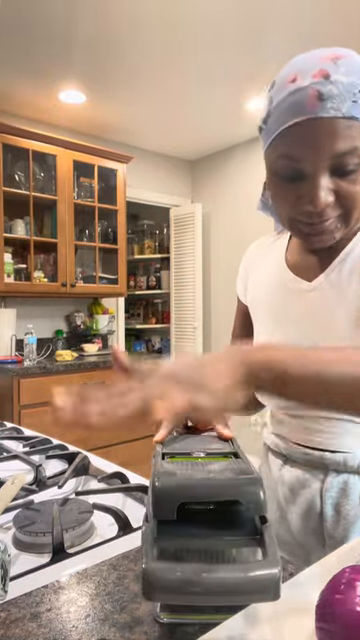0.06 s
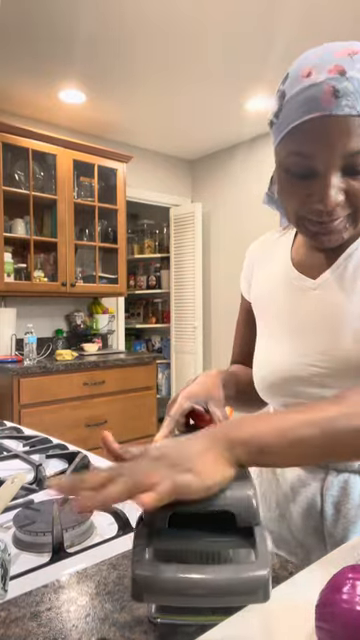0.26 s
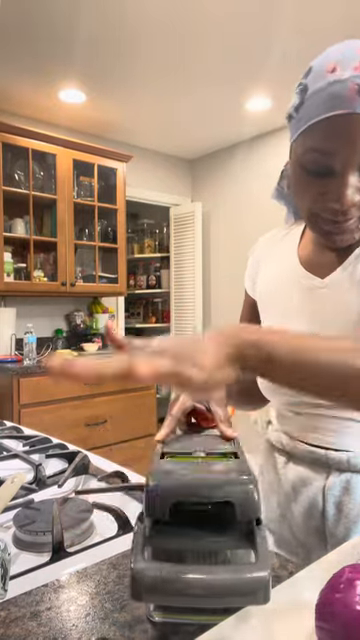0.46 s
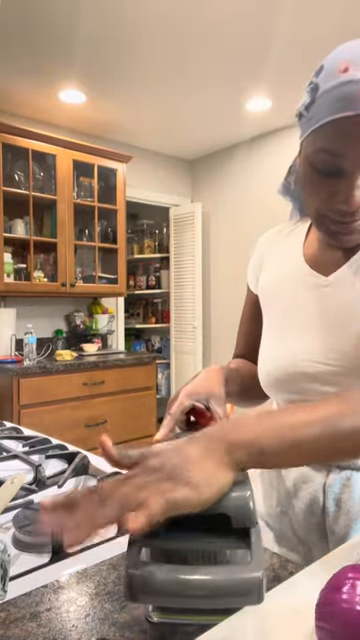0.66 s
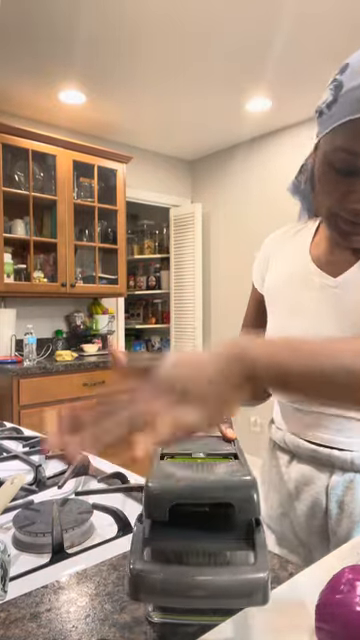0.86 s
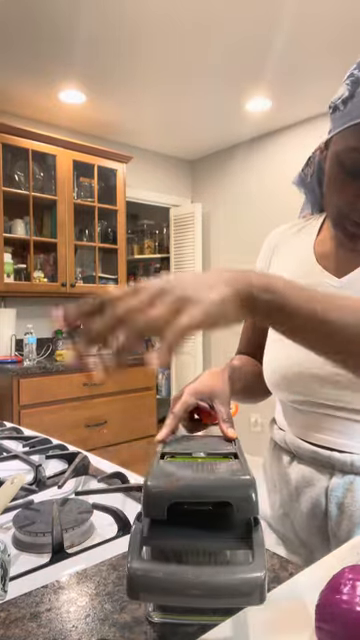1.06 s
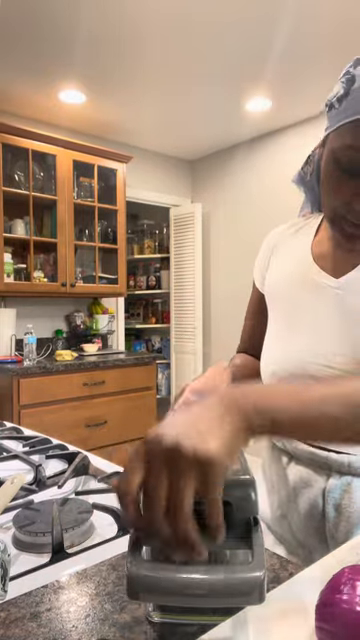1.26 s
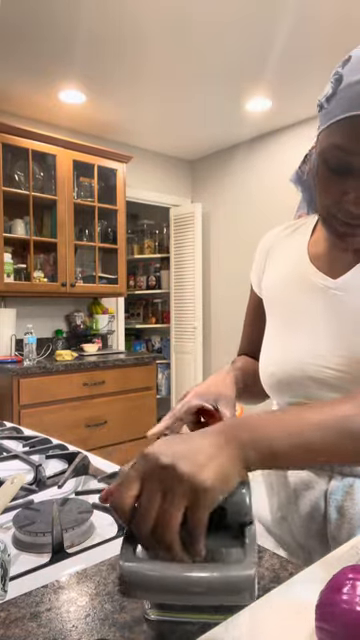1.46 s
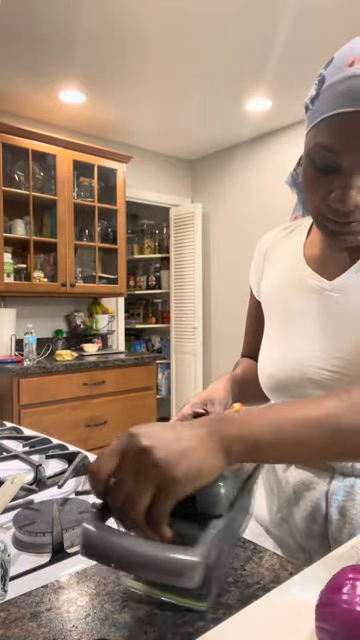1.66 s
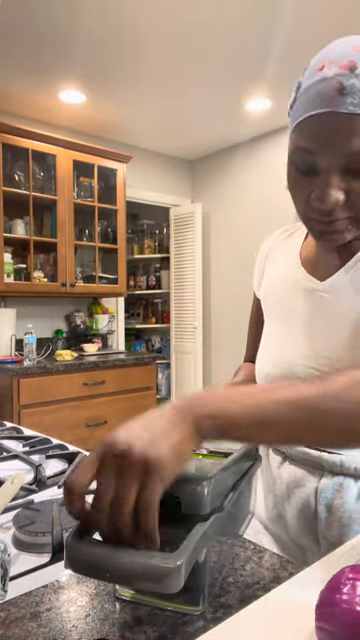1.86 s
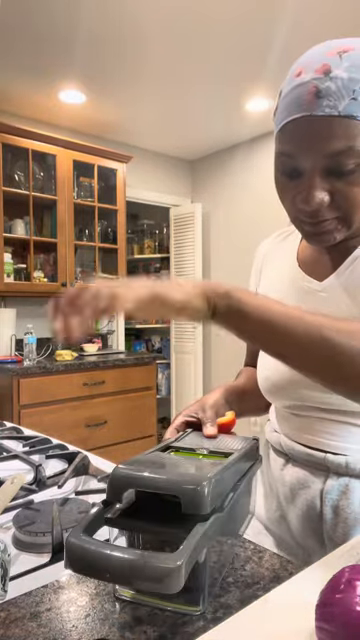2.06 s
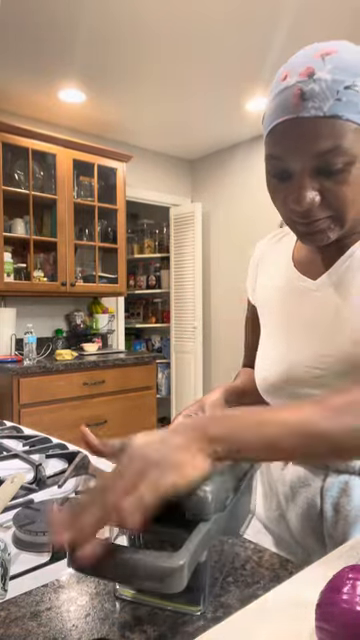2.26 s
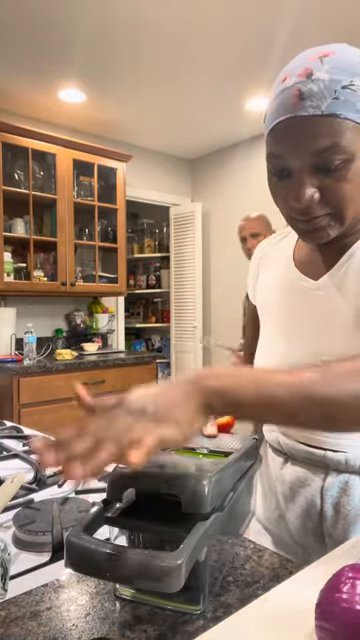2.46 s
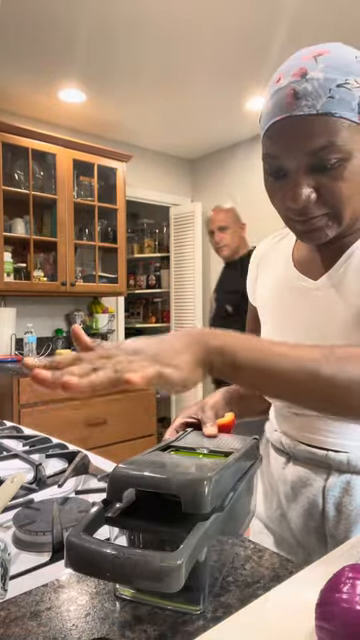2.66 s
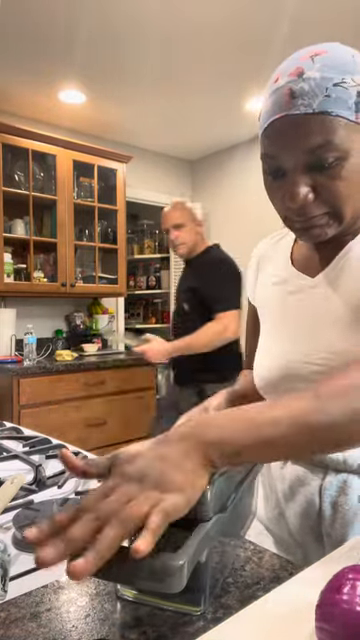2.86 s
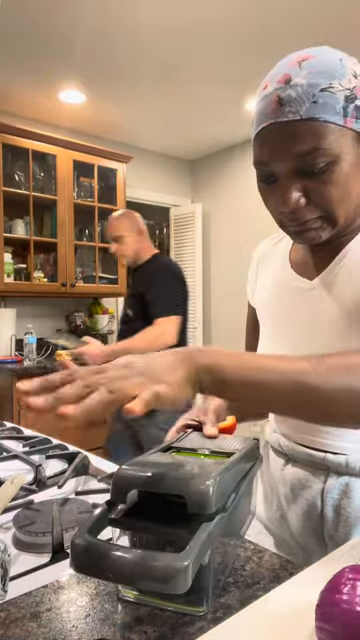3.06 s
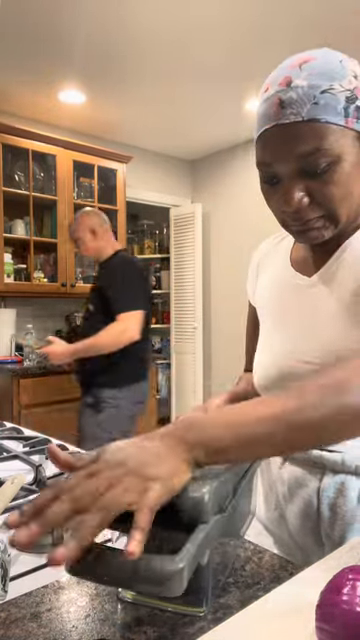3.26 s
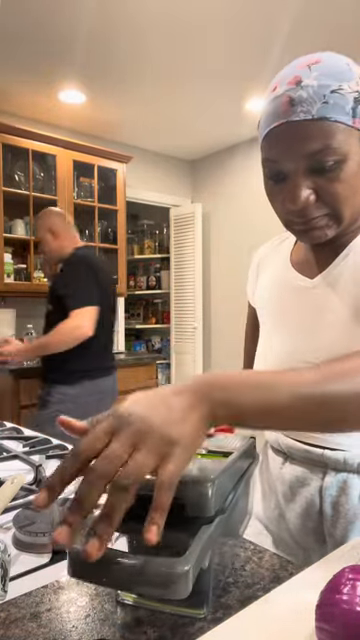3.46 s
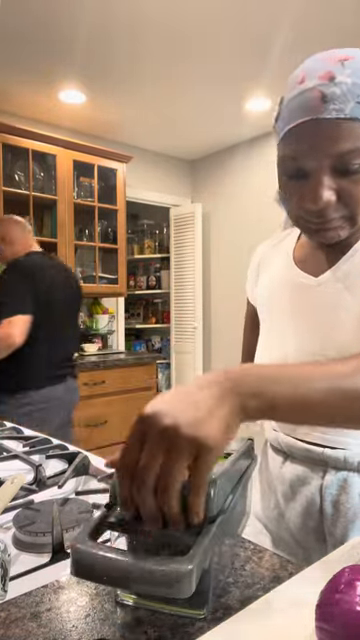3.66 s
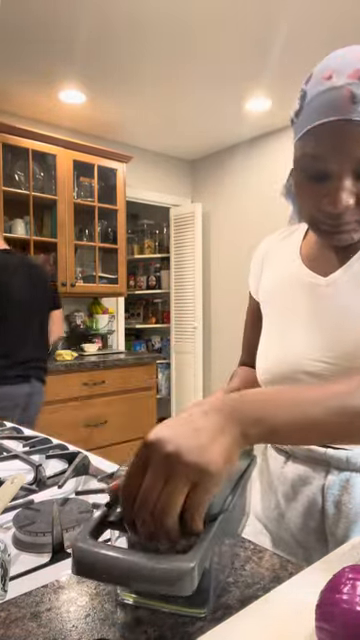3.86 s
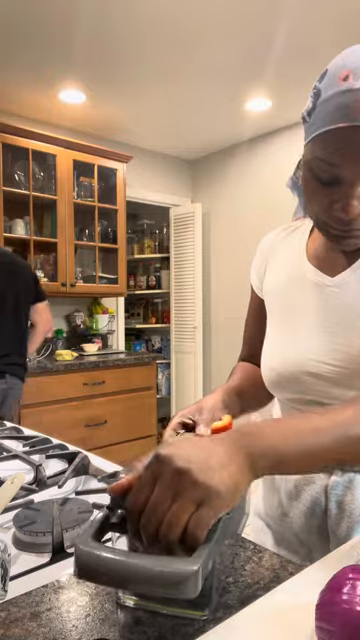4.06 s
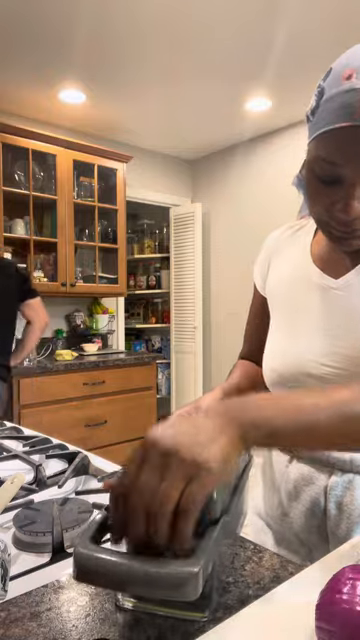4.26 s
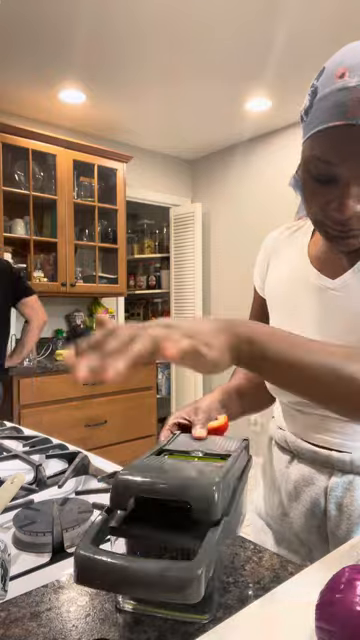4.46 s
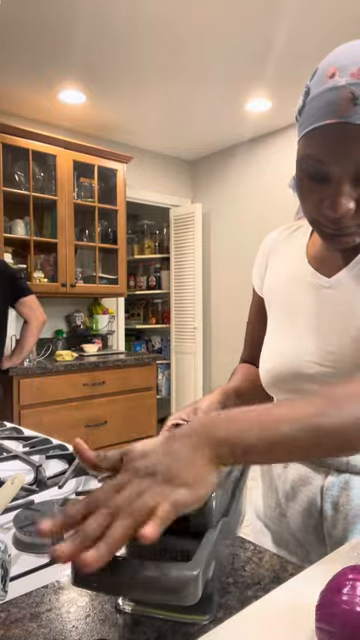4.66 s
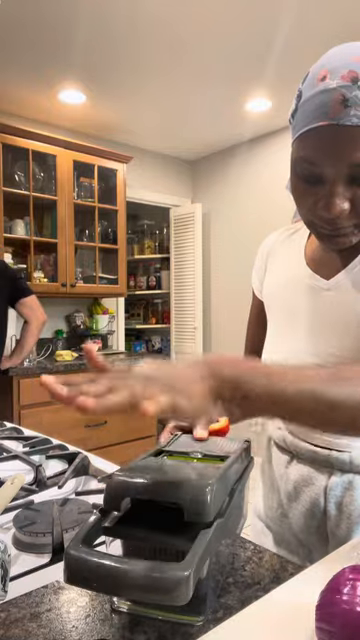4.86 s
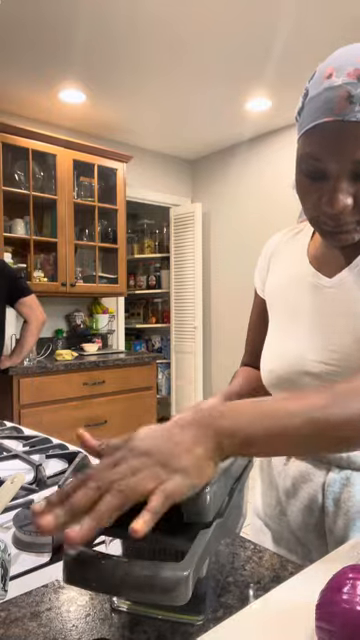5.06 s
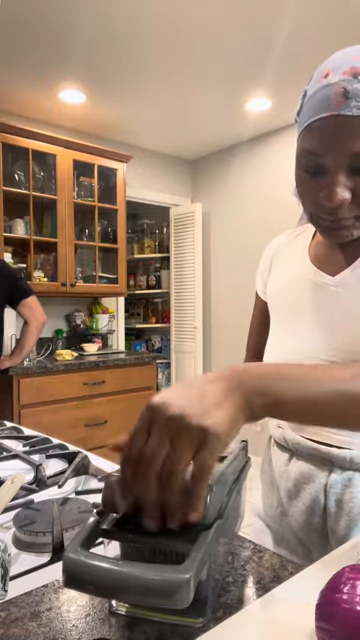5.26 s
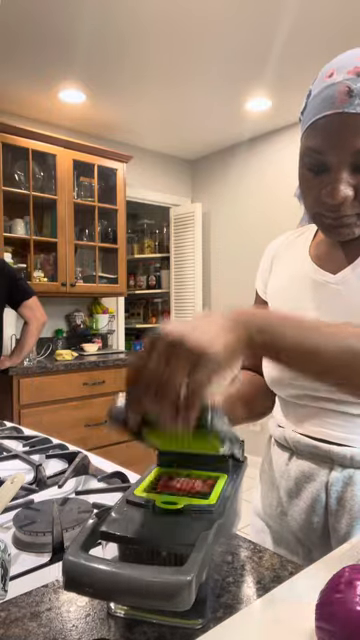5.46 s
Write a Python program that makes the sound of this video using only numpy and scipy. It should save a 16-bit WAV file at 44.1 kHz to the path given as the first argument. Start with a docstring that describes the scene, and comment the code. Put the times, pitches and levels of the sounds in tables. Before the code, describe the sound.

Seven loud, hard plastic slams in uneven groups of two, three and two, close in stereo. Between them the loose lid knocks and clacks hollowly, and fingers tick, scuff and squeak very faintly. The counter gives a brief low thump; the hard kitchen answers with a short, bright tail. A soft low room noise stays underneath.

```python
"""Slamming a vegetable chopper

A palm slams the lid of a plastic chopper seven times to force a tomato through its blade grid.
Each slam is a burst of noisy contacts that rings the box, plus a swaying counter and kitchen echoes.
Between slams the lid clacks lightly in its hinge; fingers rub, scuff and squeak as shaped noise.
Under it all lies the low noise of the quiet kitchen."""
import sys
import numpy as np
from scipy import signal
from scipy.fft import rfft, irfft
from scipy.io import wavfile
from scipy.ndimage import uniform_filter1d

SR = 44100
rng = np.random.default_rng(int(sys.argv[2]) if len(sys.argv) > 2 else 0)


def materialize(psi):
    """Save the field psi as 16-bit PCM at rate SR to the path in sys.argv[1].

    A 1-D psi becomes a single channel; in a 2-D psi each row is a channel.
    """
    bounded = np.clip(np.atleast_2d(psi).T, -1, 1)
    quanta = np.round(bounded * 32767).astype(np.int16)
    wavfile.write(sys.argv[1], SR, quanta)


N = 243032
LEAD = SR // 2  # samples of extra time before the start
AHEAD = 0.04  # seconds from the start of a blow's sound to the contact

# The four parts of a blow: knock, clack, crack and snap; the low ones are the last to build.
# The times are for a blow of length 1. Columns:
# low_hz [Hz], high_hz [Hz], delay_s [s], rise_s [s], fall_s [s], trim_db [dB]
BLOW_PARTS = [(125, 705, 0.0062, 0.007, 0.0079, -1), (540, 2700, .0045, 0.0024, 0.0071, -1),
              (1950, 5830, 0.0019, 0.0033, 0.0081, 1), (6130, 45000, 0.001, 0.0027, .004, -5)]


def amp(db):
    """Turns decibels into a gain."""
    return 10 ** (np.asarray(db) / 20)


def evened(x):
    """Scales a sound to an rms (average strength) of 1."""
    return x / np.sqrt(np.mean(x ** 2) + 1e-20)


def read(points, hz):
    """Reads a table of (Hz, value) along a logarithmic frequency axis."""
    f, value = np.transpose(points)
    return np.interp(np.log(hz + 1), np.log(np.sort(f) + 1), value)


def add(mix, s, sound):
    """Adds a sound at a time in seconds to a mix that begins LEAD samples early."""
    first = max(round(s * SR) + LEAD, 0)
    part = mix[:, first:][:, :sound.shape[-1]]
    part += sound[..., :part.shape[1]]


def causal(gain):
    """Gives a gain curve the phase (minimum phase) that makes it ring only after the blow."""
    log_gain = np.log(np.maximum(gain, 1e-5))
    circle = np.concatenate([log_gain, log_gain[-2:0:-1]])
    return np.exp(np.conj(signal.hilbert(circle)))[:len(gain)]


def noise(colour, shared_hz=450):
    """Makes coloured noise, alike at both ports in the bass and unrelated in the treble."""
    hz = np.fft.rfftfreq(N, 1 / SR)
    left, other = rfft(rng.standard_normal((2, N)))
    same = 1 / (1 + (hz / shared_hz) ** 2)
    right = same * left + np.sqrt(1 - same ** 2) * other
    pair = np.array([left, right])
    return evened(irfft(pair * amp(read(colour, hz)), N))


def air(level_db=-59.5, waver_db=1.02, waver_s=0.16):
    """The low rumble of the quiet kitchen: steady noise whose level swells and sinks a little."""
    # colour of the still air: pitch_hz [Hz], level_db [dB]
    air_colour = [(25, -12.5), (45, -2.5), (80, 1.5), (150, -6.5), (250, -7.5), (350, -10), (550, -27),
                  (850, -25.5), (1250, -30), (2200, -32), (4000, -36), (8000, -47), (11000, -50.5),
                  (14000, -65.5)]
    t = np.arange(N) / SR
    waver = np.interp(t / waver_s, np.arange(256), rng.standard_normal(256))
    return amp(level_db + waver_db * waver) * noise(air_colour)


def kitchen(x, near_db, far_db, near_t60=0.18, near_start=0.0017, far_start=0.036,
            shared_hz=380, near_low_hz=220):
    """Quick reflections from counter and stove, then the room's tail; the moving arm changes them."""
    # time for the tail to fall by 60 dB: pitch_hz [Hz], t60_s [s]
    room_t60 = [(100, 2.1), (300, 0.44), (900, 0.5457), (2500, 0.59), (5000, 0.53), (9000, 0.47),
                (13000, 0.26)]
    # strength of the tail, before far_db: pitch_hz [Hz], level_db [dB]
    room_db = [(80, -26), (170, -13.5), (350, -6.5), (900, -17), (2500, -13), (6000, -12), (10000, -13),
               (14000, -14)]
    # the echoes are dying noise, drawn afresh on every call
    hz, t, z = signal.stft(rng.standard_normal((2, SR * 5 // 8)), SR, nperseg=256)
    same = (1 / (1 + (hz / shared_hz) ** 4))[:, None]  # the bass is alike at both ports
    z[1] = same * z[0] + np.sqrt(1 - same ** 2) * z[1]

    def decay(t60, start):
        """Fades in around the start time, then dies away; its overall energy is evened."""
        shape = np.exp(-np.log(1000) * t / t60) * np.clip(2 * t / start - 1, 0, 1)
        return shape / np.sqrt(SR * t[-1] * np.mean(shape ** 2, -1, keepdims=True))

    bass_cut = (hz ** 2 / (hz ** 2 + near_low_hz ** 2))[:, None]
    near = amp(near_db) * decay(near_t60, near_start) * bass_cut
    far_gain = amp(far_db + read(room_db, hz))[:, None]
    far = far_gain * decay(read(room_t60, hz)[:, None], far_start)
    absorbed = 1 / np.sqrt(1 + (hz[:, None] / 11800) ** 24)  # steep loss of the highest treble
    room = signal.istft(z * np.hypot(near, far) * absorbed, SR, nperseg=256)[1]
    return signal.fftconvolve(x, room, axes=1)


def rubbing(rub_db=7.0, grain_db=1.0, speed_power=0.94):
    """Skin and cloth slide over the plastic with a grainy hiss; each stroke speeds up and slows down."""
    # strokes of fingers and sleeve on the lid; the levels are before rub_db:
    # fastest_s [s], level_db [dB], swell_s [s], fade_s [s]
    strokes = [(1.96,-74,.03,0.14), (3.855,-77,0.091,.065), (4.272,-64,.01,0.018), (4.295,-76,0.072,.1),
               (5.273,-62.5,0.05,0.13), (5.401,-72,0.089,.4)]
    # colour of the hiss: pitch_hz [Hz], level_db [dB]
    rub_colour = [(200, 13.5), (800, 3), (2000, -3.5), (4000, -3.5), (8000, -4), (11000, -8), (13000, -23)]
    t, level = np.arange(N) / SR, np.zeros(N)
    for s, db, swell, fade in strokes:
        speed = np.interp(t, [s - swell, s, s + fade], [0, 1, 0])
        level += amp(db) * speed ** speed_power  # friction grows with the speed
    roughness = evened(uniform_filter1d(rng.standard_normal(N), size=90))
    grain = evened(amp(grain_db * roughness))
    smooth_level = uniform_filter1d(level, size=900)
    return amp(rub_db) * smooth_level * grain * noise(rub_colour)


def squeak(start_s=3.98, length_s=0.25, level_db=-77.5, pitch_hz=(3230, 2820), width_hz=260, fade_db=-6):
    """A finger drags faintly over the lid: a narrow, sinking band of friction noise."""
    u = np.linspace(0, 1, round(length_s * SR))  # share of the drag that is done
    low_pass = signal.butter(2, width_hz / 2, fs=SR, output="sos")
    slip = signal.sosfilt(low_pass, rng.standard_normal((2, len(u))))
    turns = np.cumsum(np.interp(u, [0, 1], pitch_hz)) / SR
    tone = evened(slip * np.sin(2 * np.pi * turns))  # moves the slow noise up to the pitch
    mix = np.zeros((2, N + LEAD))
    add(mix, start_s, amp(level_db + fade_db * u) * signal.windows.tukey(len(u), .1) * tone)
    return mix


def scuffs(size=22050):
    """Soft things brush and bump: short puffs of friction noise that lose their treble."""
    # soft scuffs and dull bumps; each is dull above dull_hz:
    # start_s [s], level_db [dB], rise_s [s], t60_s [s], dull_hz [Hz]
    bumps = [(3.975,-58,0.0048,0.19,2594), (4.238,-49.5,0.015,0.37,380), (4.402,-37,0.004,0.24,459)]
    # colour before the dulling: pitch_hz [Hz], level_db [dB]
    scuff_colour = [(60, -8.5), (200, 8), (330, 7.5), (600, -3.5), (1500, -8.5), (3100, -4.5),
                    (4200, -16.5), (12000, -18)]
    mix, t, hz = np.zeros((2, N + LEAD)), np.arange(size) / SR, np.fft.rfftfreq(size, 1 / SR)
    for s, db, rise, t60, dull_hz in bumps:
        colour = amp(read(scuff_colour, hz)) / np.sqrt(1 + (hz / dull_hz) ** 3)
        puff = evened(irfft(rfft(rng.standard_normal(size)) * colour))
        fade = np.exp(-np.log(1000) * np.maximum(t - rise, 0) / t60)
        puff *= amp(db) * np.minimum(t / rise, 1) * fade
        add(mix, s, puff)
        add(mix, s, kitchen(puff[None], near_db=3.5, far_db=-1))
    return mix


def chatter(envelope, count=2):
    """A burst of tiny contacts under an envelope, with its energy spread evenly over frequency."""
    burst = envelope * rng.standard_normal(len(envelope))
    for _ in range(count):
        spectrum = rfft(burst)
        flat = irfft(spectrum / (abs(spectrum) + 1e-12))
        burst = flat * np.sqrt(envelope)
    return burst


def responses(modes, ring_hz, ring_db, depth, dull_hz=20000, size=8192, ring_share=.09):
    """How the plastic answers each part of a blow; where the hand lands changes one ring most."""
    # broad colour of the plastic: pitch_hz [Hz], level_db [dB]
    plastic_colour = [(100, -11.5), (170, -12), (215, -14), (400, -11), (560, -13.5), (700, -11),
                      (1050, -12), (1600, -18), (2100, -18.5), (2450, -21.5), (4500, -24.5), (7500, -27),
                      (10500, -32), (13500, -37)]
    # how far the left port leads the right: pitch_hz [Hz], lead_rad [radians]
    port_phase = [(330, 0), (580, -1.1), (700, -3.9), (1000, -4.3), (1120, -6.5), (1500, -4.2),
                  (2100, -5.2), (2550, -2.6), (3200, -4.6), (4200, -5.2), (4700, -8.5), (5600, -6.1),
                  (9000, -5.2), (13000, -3.6)]
    # left level against right at depth 1: pitch_hz [Hz], difference_db [dB]
    port_balance = [(330, 0), (400, -6), (520, -1), (650, -7), (830, -10), (1050, -2), (1270, -6),
                    (1430, 0), (1900, -3), (2500, -1), (4000, -6), (5300, 0)]
    hz = np.fft.rfftfreq(size, 1 / SR)
    rings = sum(amp(db) ** 2 / (1 + ((hz - f) / width) ** 2) ** 2 for f, width, db in modes)
    broad = amp(read(plastic_colour, hz))
    favoured = amp(ring_db / (1 + ((hz / ring_hz - 1) / ring_share) ** 2))
    peaks = np.sqrt(1 + rings / broad ** 2) * favoured
    soft = 1 / np.sqrt(1 + (hz / dull_hz) ** 2)  # a gentle contact loses treble
    lean = amp(depth * read(port_balance, hz) / 2)
    ports = np.array([lean * np.exp(1j * read(port_phase, hz)), 1 / lean])
    out = []
    for low_hz, high_hz, *_ in BLOW_PARTS:
        band = 1 / np.sqrt((1 + (low_hz / (hz + 1)) ** 8) * (1 + (hz / high_hz) ** 6))
        # a smaller depth flattens the resonances
        out.append(ports * causal(broad * soft * peaks ** depth * band))
    return out


def blow(plastic, levels_db, length, run_in_db, run_in, size=8192, skid_s=0.017, skid_hz=4494):
    """The lid skids, chatters against the frame and rings the plastic; the sound starts before contact."""
    t = np.arange(size) / SR - AHEAD
    skid_start = np.clip((t + skid_s) / 0.0059, 0, 1)  # fades in from skid_s before landing
    out = np.zeros((2, size))
    for response, db, (low_hz, _, delay, rise, fall, trim_db) in zip(plastic, levels_db, BLOW_PARTS):
        u = t / max(length, .2) - delay  # a long blow stretches time
        contact = np.exp(-(u / np.where(u < 0, rise, fall)) ** 2 / 2)
        dulling = 1 + (low_hz / skid_hz) ** 2  # the skid is weaker in the high parts
        skid = amp(run_in_db) * np.exp(-abs(u) / run_in) * skid_start / dulling
        part = irfft(rfft(chatter(contact + skid)) * response)
        out += amp(db + trim_db) * evened(part)
    return out


def thump(size=16384, soft=0.00092, low_hz=48):
    """Low sway of counter and box, pushed down first and then springing back."""
    # one sway under the blow and one as the hand bottoms out:
    # delay_s [s], pitch_hz [Hz], t60_s [s], level_db [dB]
    sways = [(.0148, 77.03, 0.13, 3.5), (.0325, 103.8, 0.071, -2)]
    t, out = np.arange(size) / SR, np.zeros(size)
    for k, (delay, hz, t60, db) in enumerate(sways):
        u = np.maximum(t - delay, 0)
        fade = np.exp(-np.log(1000) * u / t60)
        onset = 1 - np.exp(-u / soft)
        out -= (-1) ** k * amp(db) * fade * np.sin(2 * np.pi * hz * u) * onset
    out = signal.sosfilt(signal.butter(4, low_hz, "high", fs=SR, output="sos"), out)
    return out * amp(0) * np.array([[1.0], [1.0]]) * amp([[-.4], [.4]])  # slightly louder on the right


def ticks(from_s=1.38, to_s=1.9, ticks_per_s=14, tick_db=-60.5, spread_db=1.0, hardness_db=-4,
          push_db=-5, length=.7, ring_hz=800):
    """Fingers that hold the lid make it tick faintly: light clacks at uneven, random moments."""
    times = np.arange(from_s, to_s, 1 / ticks_per_s)
    late, strength = rng.uniform(-0.88, 1, (len(times), 2)).T
    moments = times + late / ticks_per_s / 2
    return [(s, tick_db + spread_db * k, hardness_db, push_db, length, ring_hz)
            for s, k in zip(moments, strength)]


def clacks(clack_db=-15.0, sway_db=-4.5):
    """The loose lid knocks hollowly on its frame; a harder contact has more treble."""
    # light clacks of the lid rocking in its hinge; levels are before clack_db and sway_db:
    # contact_s [s], level_db [dB], hardness_db [dB of treble], push_db [dB of thump against clack],
    # length [factor], ring_hz [Hz, the ring it brings out]
    lid_clacks = [(0.308,-38,-1.5,-11,1.28,1710), (0.338,-27,-2,-6,0.62,705),
                  (0.723,-36.5,4.5,-12,0.83,810), (1.034,-49,-2,-2,0.81,912), (1.14,-50.5,-13,-7,0.96,970),
                  (1.27,-31.5,-1,-0.5,0.7,426.6), (1.289,-41,3,6,1.1,825), (1.339,-44,-0.5,3.5,1.3,636),
                  (1.729,-25,0.5,-3.5,0.84,747), (1.751,-40.5,-0.5,4,1.0,239),
                  (1.849,-38.5,-8.5,1.5,0.59,890), (1.905,-44,-7.5,-7,0.6,845),
                  (2.378,-32.5,3.5,-15.5,2.33,588), (3.454,-41.5,-20,-15.5,2,645),
                  (3.470,-33,-3.5,-21,0.97,725), (3.481,-32,7,-10,0.76,760),
                  (4.002,-59.5,-0.5,23.5,0.85,902), (4.275,-49,-0.5,-11,0.38,790),
                  (4.3,-47,-5,-13.5,0.86,645), (5.345,-41.5,1,-12,0.56,748)]
    # make-up of a clack, for knock, clack, crack and snap:
    # level_db [dB], follows [share of the hardness]
    make_up = [(0.5, 0.041), (-1.36, .15), (-12, .9), (-21, 0.95)]
    # resonances of the loose lid: pitch_hz [Hz], width_hz [Hz], level_db [dB]
    lid_modes = [(246,28,-8), (429,29,1.5), (630,32,1.5), (770,35,-8.5), (825,17,-2), (960,95,-9),
                 (1480,90,-11.5), (1789,70,-8.5), (2000,38,-13.5), (3750,41,-19)]
    mix, sway = np.zeros((2, N + LEAD)), thump()
    parts_db, follows = np.transpose(make_up)
    for s, db, hardness_db, push_db, length, ring_hz in lid_clacks + ticks():
        lid = responses(lid_modes, ring_hz, ring_db=7.0, depth=0.89, dull_hz=895)
        levels_db = db + parts_db + follows * hardness_db
        clack = amp(clack_db) * blow(lid, levels_db, length, run_in_db=-20, run_in=0.0025)
        add(mix, s - AHEAD, clack)
        add(mix, s - AHEAD, kitchen(clack, near_db=-2.5, far_db=-4.5))
        add(mix, s, amp(db + push_db + sway_db) * sway)
    return mix


def gripped(modes):
    """The palm loads the box differently each time: every resonance shifts in pitch and strength."""
    pitch, strength = rng.standard_normal((2, len(modes)))
    hz, width, db = np.transpose(modes)
    return np.transpose([hz * (1 + .008 * pitch), width, db + 1.8 * strength])


def slams(slam_db=-7.5, sway_db=1.5, spread_depth=0.45, thump_db=-11.5, thump_follows=.4,
          earlier_s=.24, earlier_db=3):
    """Each slam is a burst of plastic chatter over the thump of the counter."""
    # slams of the lid; levels are before slam_db:
    # contact_s [s], level_db [dB], run_in_db [dB against the crack], length [factor],
    # ring_hz [Hz], ring_db [dB by which the blow lifts or weakens that ring]
    lid_slams = [(0.197,0.5,-17.5,0.83,857,4), (0.590,-0.25,-8,0.92,1163,8), (2.232,-1,-8.5,1.24,417,10),
                 (2.723,-2,-10.5,0.95,1238,6), (3.156,-1,-7,1.34,830,-9), (4.553,-0.3,-19,0.97,325,9.5),
                 (4.937,-3.5,-13,1.29,1432,4)]
    # make-up of every slam: level_db [dB] of knock, clack, crack and snap
    make_up_db = [-21.5, -15, -21.5, -23.5]
    # resonances of the box, before the grip shifts them: pitch_hz [Hz], width_hz [Hz], level_db [dB]
    box_modes = [(278,72,-6.5), (329,19,0.5), (433,30,-3.5), (509,21,-9.5), (645,77,-7), (827.3,38,2),
                 (985,40,-7.5), (1154,26,-8), (1374,12,-10), (1428,75,-9), (1740,34,-9.5), (1936,52,-14.5),
                 (2082,9.2,-10.5), (2270,100,-17), (2745,170,-15.5), (2960,130,-16.5), (3390,36,-13),
                 (3670,65,-18), (4280,200,-19.5), (5010,60,-17), (5380,63,-21), (6802,180,-24.5),
                 (7440,140,-25.5)]
    mix, sway = np.zeros((2, N + LEAD)), thump()
    boom = kitchen(sway, near_db=-14.5, far_db=-3.5)
    for s, db, run_in_db, length, ring_hz, ring_db in lid_slams:
        box = gripped(box_modes)
        levels_db = db + np.array(make_up_db)
        push_db = thump_db + thump_follows * db

        def burst(depth):
            """One draw of the chatter, with the box resonances at a chosen depth."""
            plastic = responses(box, ring_hz, ring_db, depth)
            return amp(slam_db) * blow(plastic, levels_db, length, run_in_db, run_in=0.014)

        crack = burst(1)
        # what spreads into the room leaves all sides of the box, so its resonances are evened out
        spread = burst(spread_depth)
        add(mix, s - AHEAD, crack)
        add(mix, s - AHEAD, kitchen(spread, near_db=-6, far_db=-2))
        add(mix, s, amp(push_db + sway_db) * sway)
        add(mix, s, amp(push_db) * boom)
    # a slam shortly before the start is still dying away; it reuses the last slam's burst
    dying = amp(earlier_db) * kitchen(spread, near_db=-10, far_db=2.5)
    add(mix, -earlier_s - AHEAD, dying)
    return mix


def scene():
    """The chopper close by, the rubbing and the still air."""
    chopper = slams() + clacks() + scuffs() + squeak()
    return chopper[:, LEAD:] + rubbing() + air()


def record(dry, edge_hz=15000):
    """Soft overload on the highest peaks, then a cut of everything above the edge."""
    held = dry / (1 + dry ** 6) ** (1 / 6)
    low_pass = signal.firwin(511, edge_hz, window=("kaiser", 9), fs=SR)
    return signal.oaconvolve(held, low_pass[None], "same")


dry = scene()
out = record(dry)
materialize(out)
```